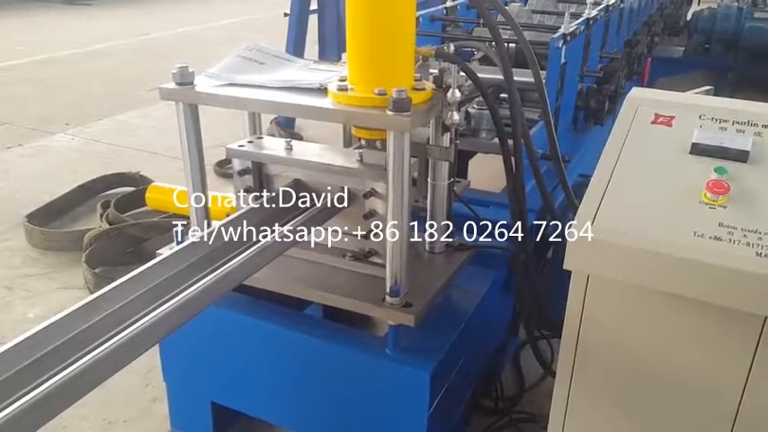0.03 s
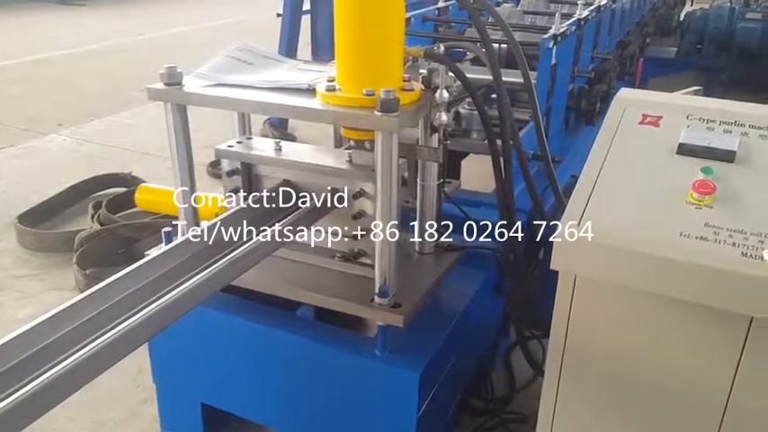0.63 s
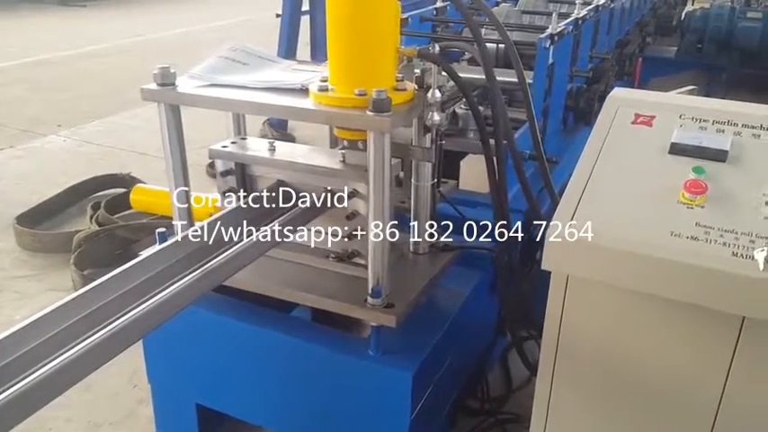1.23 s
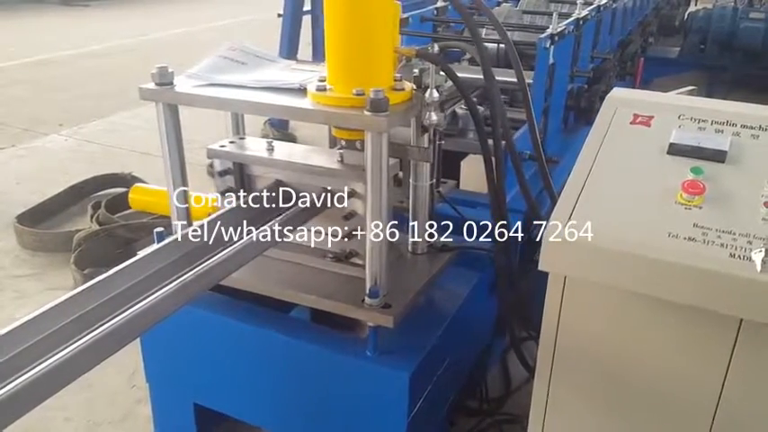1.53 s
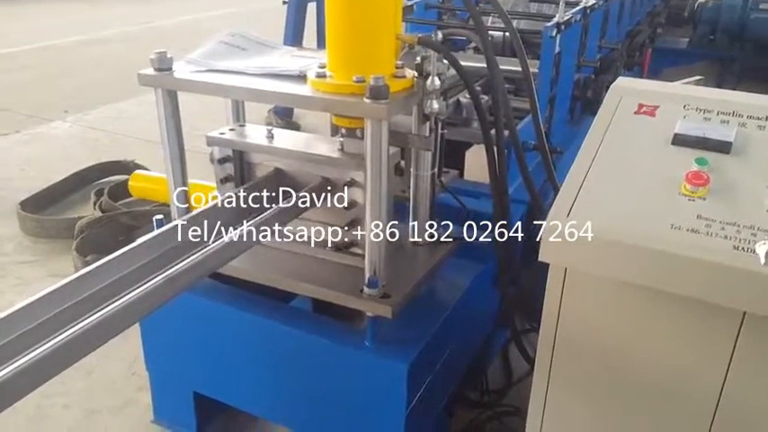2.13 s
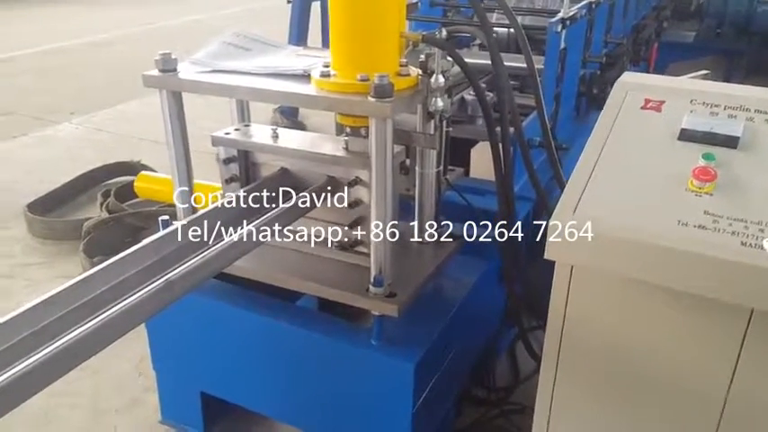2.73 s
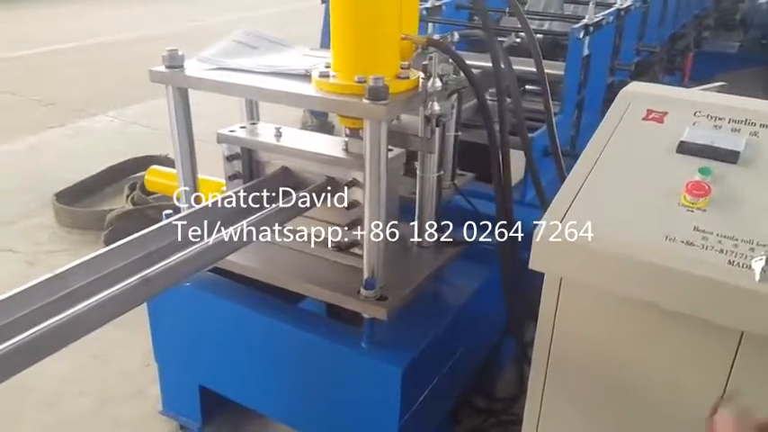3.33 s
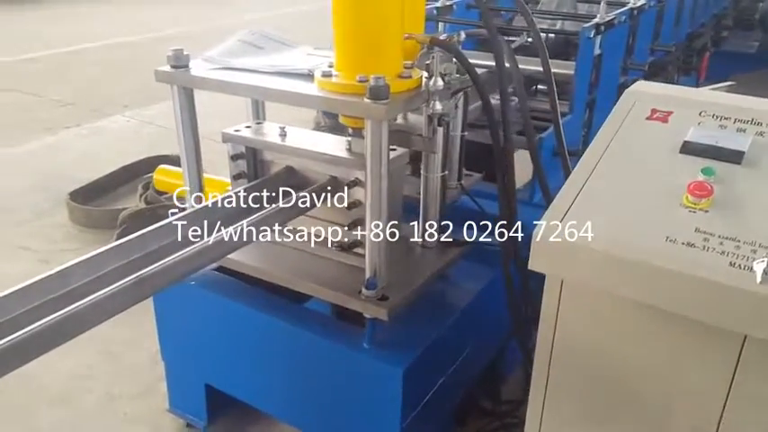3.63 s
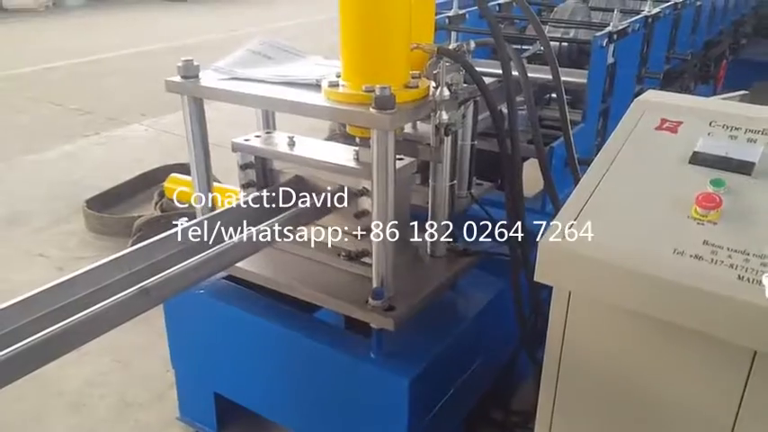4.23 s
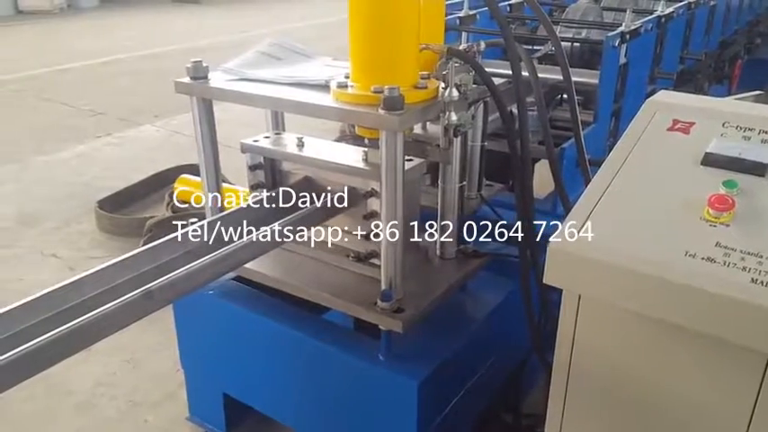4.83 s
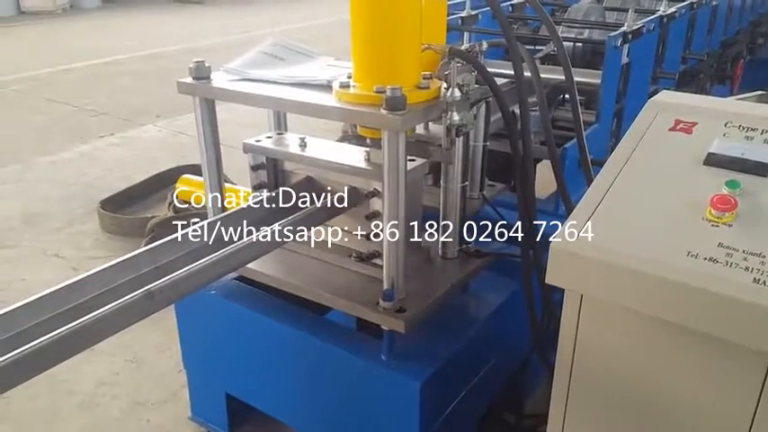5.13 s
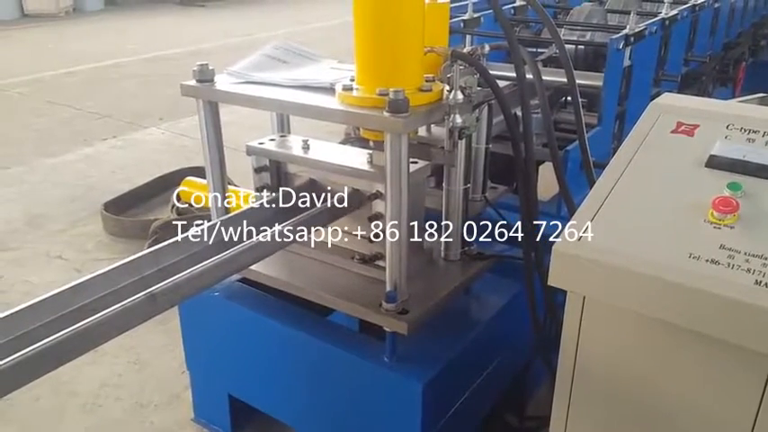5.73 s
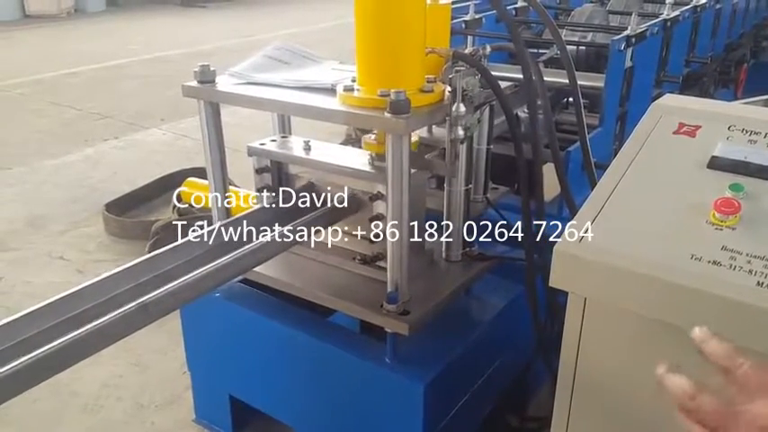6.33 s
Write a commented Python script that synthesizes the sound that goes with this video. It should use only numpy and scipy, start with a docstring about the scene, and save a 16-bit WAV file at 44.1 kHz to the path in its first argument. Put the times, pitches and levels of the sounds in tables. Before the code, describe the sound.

A hydraulic pump drones over the rumble and fine rattle of a metal forming machine, its tone shifting as the microphone moves nearby. Rollers groan, and sliding steel adds a hiss, brief scrapes and a faint squeal. Then the drive thuds and winds down, and a blade cuts the steel channel with one loud metallic bang, leaving a short jangle and a workshop echo.

```python
"""A workshop hall, with a stereo pair drifting past the hydraulic cutter of a roll forming machine.
The ten-vane pump hums on multiples of its shaft speed, its tones shifting as we cross standing waves.
The rolls rumble and groan under load; the steel strip hisses, scrapes and squeals through them.
Near six seconds the line stops with a thud, the hum sinks, and the blade shears the steel channel
with a bang that rings in the hall."""
import sys
import numpy as np
from scipy import signal
from scipy.fft import rfft, irfft
from scipy.io import wavfile

SR = 44100
rng = np.random.default_rng(int(sys.argv[2]) if len(sys.argv) > 2 else 0)


def store_wav(level_fs):
    """Save 16-bit WAV to argv[1]."""
    pcm = np.round(np.clip(np.atleast_2d(level_fs), -1, 1) * 32767)
    wavfile.write(sys.argv[1], SR, pcm.T.astype(np.int16))


N = 291060
T = np.arange(N) / SR
SHAFT_HZ, STOP_S, BRAKE_HZ_PER_S = 24.747, 5.87, 10.5  # the drive is switched off and the shaft slows
CUT_S, REST_DB_PER_S = 6.08, 25.5  # the cutter takes the oil and the line comes to rest
THROB_S, THROB_RISE_S = 3.38, 0.87  # we enter a spot where the pump's upper tones largely beat together

# The microphone's path. Each row: time in seconds, place (0, 1 and 2 are three spots in the hall).
PLACE = [(0, 0.34), (.9, 0), (2.8, 0.88), (3.4, 1.3), (4.0, 1.73), (4.7, 1.87), (6.6, 2.06)]
# Balance at the pair. Each row: frequency in Hz, left over right in dB.
BALANCE = [(100, -0.6), (500, 0), (1000, -0.5), (1700, 1), (2500, -7), (3300, -8), (4500, 0), (7000, 1),
           (10000, -7), (12000, -6.5), (14000, 3)]
# The rolls bear down about every two seconds. Each row: time in seconds, load in dB, groan pitch in Hz.
LOAD = [(0, 1, 584), (.11, -5, 544), (.24, -6, 553), (.44, -11.5, 547), (.75, -9, 555), (1.22, -9.5, 460),
        (1.4, -4.5, 517), (1.6, -4.5, 588), (1.84, 0, 608), (2.02, -3.5, 560), (2.3, -4, 533),
        (2.44, -10, 535), (3.35, -11.5, 522), (3.55, -6, 533), (3.8, -4, 557), (4.04, -2.5, 520),
        (4.55, -10.5, 532), (5.85, -20, 525)]
# Spectra of the rolls, the drive and the rubbed strip. Each row: frequency in Hz, relative level in dB.
ROLL_DRONE = [(100, -35), (200, -4.5), (270, 1), (340, -4.5), (410, -6), (520, -3), (610, -2), (720, -5),
              (950, -10.5), (1300, -15.5), (2500, -30), (6000, -63), (10000, -91)]
DRIVE_RUSH = [(80, -19), (280, -3.5), (420, -5.5), (580, -5.5), (800, 1), (1000, -2), (1250, -5),
              (1600, -10), (2100, -14.5), (3000, -28.5), (5000, -35), (8000, -63), (14000, -75)]
STRIP_HISS = [(100, -43), (500, -23), (1200, -13), (1800, -2.5), (2100, -2), (2450, -1.5), (3000, -4),
              (3500, -5), (4300, -13.5), (4900, -16.5), (5400, -19), (6300, -24.5), (7200, -36.5),
              (8600, -52), (14000, -62)]


def pump(turns, waver_db=1.3, drift_rad=0.15, flutter=0.018, breakup_db=5, throb_lag=0.83):
    """Vane pulses and their once-a-turn sidebands; each tone swells and fades as the microphone moves."""
    # Each entry, by multiple of shaft speed: level in dB at each of the three spots,
    # left over right in dB, left lead in radians.
    tones = {10: (-25.5, -23, -24.5, 1.5, 0), 11: (-44.5, -51, -40, -3.5, 2),
             18: (-46, -39, -46, 2.5, -3.5), 19: (-29, -24, -22, 0, 0.2), 20: (-34, -33.5, -32.5, 0, -.5),
             28: (-47, -40.5, -39.5, 0.5, 1), 29: (-30.5, -26, -29, 4.5, 0.5),
             30: (-28, -27, -34.5, 1.5, 0.1), 31: (-35.5, -29.5, -23, 2.5, 1),
             32: (-47, -32.5, -39.5, -1, 0), 34: (-48, -49, -45.5, 7, 1), 35: (-38.5, -58.5, -54, 3, 2.5),
             36: (-33, -37.5, -39.5, 2, -0.5), 37: (-32.5, -42, -34.5, 8, -0.7), 38: (-36, -34, -34, 3, 1),
             39: (-29, -23.5, -27, 4, -0.8), 40: (-33, -36, -31.5, 7.5, 2), 41: (-27.5, -33, -44.5, -4, 0),
             42: (-34.5, -38.5, -42.5, 3, -0.3), 43: (-48.5, -45.5, -47.5, 1.5, 0),
             49: (-49.5, -42.5, -43, -2.5, 4), 50: (-32, -35, -31, 6, -1.1),
             51: (-47.5, -47.5, -45, 6.5, -0.5), 57: (-58.5, -47.5, -43.5, 5, -2),
             59: (-37.5, -47.5, -51.5, -3, 1.2), 60: (-35, -37, -35, 2.5, -2),
             61: (-40.5, -39.5, -41, 9, -1.8), 62: (-50, -51, -51, 2.5, 3), 68: (-46, -49.5, -45, 4.5, 2),
             69: (-47, -42, -40, 9, -3.5), 70: (-55.5, -45.5, -45.5, 7.5, -1.5),
             71: (-45, -41, -42.5, -0.5, -2.5), 78: (-48.5, -46, -57, 10.5, 0.7),
             90: (-67, -53.5, -60, -9, 3), 97: (-52.5, -46.5, -60, -4.5, -2),
             100: (-57, -53.5, -52, -3.5, 2.5), 140: (-63.5, -61.5, -54.5, -4, 3.5),
             160: (-63, -57.5, -57.5, 0, -1)}
    place, out = curve(PLACE), np.zeros((2, N))
    vane_lag = rng.random(size=20)  # in turns; each vane harmonic shares its lag with its sidebands
    focus = 0.68 * ramp(THROB_S, THROB_RISE_S)
    slowing = 1 - shaft_speed() / SHAFT_HZ
    for order, (*place_db, side_db, lead) in tones.items():
        # a sinking tone beats with its echoes and breaks up; those near the casing's resonance hold on
        off_resonance = min(abs(order - 34) / 15, 1) ** 2
        smear = flutter + (10 + 26 * off_resonance) * slowing
        breakup = np.minimum(smear, 1)
        beats_db = breakup * (breakup_db * (np.tanh(wander(18)) - .5) - 5 * off_resonance)
        tone_db = np.interp(place, np.arange(len(place_db)), place_db)
        tone_db -= 0.16 * breakup * np.maximum(tone_db + 31, 0)  # loud tones lose their standing wave
        level = amp(tone_db + waver_db * wander(2.4) + beats_db)
        # echoes spread the sidebands into an even grind; in focus the upper ones throb once a turn
        harmonic = round(order / 10)
        sideband = order - 10 * harmonic
        spread = (.21 * sideband ** 2 + .5) % 1 - .5 + .12 * (rng.random() - .5)
        lag = vane_lag[harmonic] + throb_lag * order + spread * (1 - focus * (order >= 35))
        phase = 2 * np.pi * (order * turns - lag) + drift_rad * wander(1.0) + smear * wander(30)
        out += level * amp(split(side_db)) * np.cos(phase + split(lead))
    return np.sqrt(2) * amp(effort_db()) * out


def cutter(crack_db=-5, frame_db=-8, ring_db=-23, hall_db=-22, hall_rise_s=0.028, jangle=0.0081):
    """Each blow is a short crunch that shakes the frame, jangles the loose channel and fills the hall."""
    # Each row: start in seconds, level in dB, crunch decay in seconds, treble tilt in dB per octave,
    # ringing in dB. The blade's first touch pins the channel and damps it.
    blows = [(6.092, -10, 0.042, 3.5, -6), (6.106, -14.5, 0.011, 0, -2.5), (6.135, -12.5, 0.0053, 3.5, 2),
             (6.140, 4.5, .0085, -2, -2.5), (6.151, -1, 0.014, -0.5, -2.5), (6.192, -9, 0.0079, -8, 3.5),
             (6.216, -6, 0.037, -7.5, -0.5), (6.315, -5, .006, -14, -9), (6.359, -32, .01, -16, -2),
             (6.464, -17.5, .017, -12, 7.5), (6.495, -14, 0.024, -12.5, 3)]
    # The crunch. Each row: frequency in Hz, relative level in dB.
    crunch = [(40, -35), (120, -20), (280, -2), (560, 0.5), (1000, 2.9), (1500, 1), (2400, 4), (3100, -5.5),
              (4000, -11), (5200, -10), (7000, -26), (10000, -30), (14000, -19)]
    # The channel's ring. Each row: frequency in Hz, relative level in dB, seconds to fall 60 dB.
    channel_modes = [(539, -4.5, .8), (592, 4, 0.52), (683, -9, 0.4), (750, -5, 0.57), (826, -8, 0.9),
                     (860, 1, 0.8), (1230, -13, 0.88), (1344, 4, 0.36), (1459, 9.5, 0.47),
                     (1696, 4.5, 0.57), (1793, -1, 0.3), (1830, 2, 0.57), (1994, 1, 0.74),
                     (2180, -16, 0.37), (2326, 9, 0.28), (2430, 0.5, 0.43), (2460, 8, 0.35),
                     (2596, 5, 0.46), (2740, -8, 0.51), (3415, -6.5, 0.39), (4460, 1, .28), (5039, -9, .26),
                     (5600, -15, .28), (6330, -11.5, 0.4), (6900, -17, 0.43)]
    # Decay of the press frame and of the hall. Each row: frequency in Hz, seconds to fall 60 dB.
    frame_decay = [(100, 0.13), (1000, 0.14), (2400, 0.22), (5000, 0.15), (9000, 0.084), (14000, 0.068)]
    hall_decay = [(100, 2.2), (500, 3.9), (1000, 2.8), (2400, 1.53), (4000, 1.44), (7000, 0.26),
                  (10000, 0.45), (14000, 0.25)]
    t, hz, out = T[:SR], np.fft.rfftfreq(SR, 1 / SR), np.zeros((2, N))
    pad = 256  # samples of room for the tilt filter ahead of the attack
    for s, db, decay_s, tilt_db, ringing_db in blows:
        crack = amp(crack_db) * noise(crunch, size=SR) * np.exp(-t / decay_s)
        frame = amp(frame_db) * fade(noise(crunch, size=SR), frame_decay)
        hall = amp(hall_db) * fade(noise(crunch, size=SR), hall_decay) * (1 - np.exp(-t / hall_rise_s))
        # the channel chatters in the die, so its modes waver
        clock = t + jangle * np.cumsum(wander(58)[:SR]) / SR
        ring = np.zeros((2, SR))
        for mode_hz, mode_db, t60 in channel_modes:
            level = amp(ring_db + mode_db + split(at_hz(BALANCE, mode_hz))) * decay(t, t60)
            ring += level * np.sin(2 * np.pi * (mode_hz * clock + rng.random((2, 1))))
        blow = np.pad(crack + amp(ringing_db) * (frame + hall + ring), ((0, 0), (pad, 0)))
        # hard contacts are bright, the settling of the loose piece is dull
        colour = amp(tilt_db * np.log2(1 + hz / 2000))
        add(out, s - pad / SR, amp(db) * irfft(rfft(blow, SR) * colour, SR))
    return out


def rolls(turns, rumble_db=-31, shudder_db=4, drone_db=-18, rush_db=-26, throb_lag=0.83):
    """The frame rumbles and shudders, the rolls drone with load, the drive's rush throbs once a turn."""
    # The frame's rumble and the deep shake of its base. Each row: frequency in Hz, relative level in dB.
    frame_rumble = [(15, -23), (32, -15), (41, -13.5), (50, -7.5), (68, -7), (92, 0), (130, -3.5),
                    (190, -5), (280, -5), (600, -52), (3000, -100)]
    base_shake = [(20, -18), (36, -9), (50, 0.5), (65, -3), (90, -15.5), (200, -53.5), (1000, -100)]
    load_db = curve(LOAD)
    frame_jerks, base_jerks = shudders()
    rumble = noise(frame_rumble) * np.hypot(amp(rumble_db + 0.26 * load_db), amp(shudder_db) * frame_jerks)
    drone = noise(ROLL_DRONE) * amp(drone_db + 0.69 * load_db)
    throb = 0.18 * ramp(THROB_S, THROB_RISE_S) * np.cos(2 * np.pi * (turns - throb_lag))
    rush = noise(DRIVE_RUSH) * amp(rush_db) * (1 + throb)
    return rumble + noise(base_shake) * base_jerks + drone + rush


def groan(level_db=-24):
    """The loaded rolls ring in one moving resonance: a narrow core inside a rough skirt."""
    hz = curve(LOAD, column=2)
    core = resonate(noise(ROLL_DRONE), hz, width_hz=15)
    skirt = resonate(noise(ROLL_DRONE), hz, width_hz=70)
    return (core + skirt) * amp(level_db + curve(LOAD))


def strip(rub_db=-31, slide_db=-62, grain_db=0.5, ripple_db=2.2, mode_spacing_hz=24):
    """Steel rubs through the rolls, ringing in many close modes, and slides grainily through the die."""
    # Resonances of the strip. Each row: frequency in Hz, width in Hz, height above the hiss in dB.
    peaks = [(1750, 79, 5.5), (2244, 76, 6.5), (2750, 110, 3), (3280, 200, 2), (3630, 140, 2),
             (4510, 300, 5)]
    # The sheet sliding in the die. Each row: frequency in Hz, relative level in dB.
    die_hiss = [(2000, -28.5), (4900, -4), (5300, 29.5), (5800, 18.5), (6500, 15.5), (7000, 13.5),
                (7900, 7.5), (8600, -12.5), (9500, -0.5), (12000, -3), (14000, -4)]
    hz, modes_hz = np.fft.rfftfreq(N, 1 / SR), np.arange(0, SR / 2, mode_spacing_hz)
    modes_db = ripple_db * np.interp(hz, modes_hz, rng.standard_normal(len(modes_hz)))
    modes_db += sum(db / (1 + (2 * (hz - peak_hz) / width) ** 2) for peak_hz, width, db in peaks)
    rub = noise(STRIP_HISS, detail_db=modes_db) * amp(rub_db + rubbing_db())
    # the sheet scrapes in the die, then slides more freely, then comes to rest
    sliding_db = 14.5 * ramp(1.19, .3) - 5.5 * ramp(2.44, 0.93) - REST_DB_PER_S * since(CUT_S) / 2
    slide = noise(die_hiss, detail_db=modes_db) * amp(slide_db + sliding_db)
    return (rub + slide) * amp(grain_db * wander(120))


def stick_slip():
    """The strip sticks and slips on a roll in clear groans, and its edge scrapes along the guides."""
    # Each row: start in seconds, length in seconds, first and last pitch in Hz, level in dB.
    groans = [(.04, 0.12, 581, 557, -21.5), (.06, 0.14, 475, 460, -23), (.15, .42, 546.5, 550, -27),
              (1.22, .11, 440, 453, -24.5), (1.33, 0.12, 496, 516, -24), (1.52, .22, 595, 620, -32),
              (1.74, 0.15, 625, 616, -25), (2.1, 0.39, 560, 538.5, -26.5)]
    scrapes = [(.68, 0.074, 2500, 2530, -40), (.77, 0.28, 2530, 2485, -47), (1.23, .23, 2405, 2460, -46.5),
               (1.67, 0.17, 1860, 1800, -37), (1.89, 0.15, 2720, 2680, -44), (2.02, .08, 2610, 2650, -36)]
    return (slip_notes(groans, blur_rad=0.29, waver_hz=35, flicker_db=1)
            + slip_notes(scrapes, blur_rad=1.3, waver_hz=60, flicker_db=3))


def slip_notes(notes, blur_rad, waver_hz, flicker_db):
    """Each friction note swells, glides and wavers as the grip changes."""
    out = np.zeros((2, N))
    for s, length, first_hz, last_hz, db in notes:
        part = slice(round(s * SR), round((s + length) * SR))
        hz = first_hz + (last_hz - first_hz) * ramp(s, length)[part]
        phase = 2 * np.pi * np.cumsum(hz) / SR + blur_rad * wander(waver_hz)[part]
        level = amp(db + flicker_db * wander(waver_hz)[part]) * swell(s, length)[part]
        add(out, s, np.sqrt(2) * level * np.cos(phase) * amp(split(at_hz(BALANCE, first_hz))))
    return out


def thud(rise_s=0.016):
    """The frame booms softly as the drive stops, and again as the cutter recoils."""
    # The frame's modes. Each row: frequency in Hz, relative level in dB, seconds to fall 60 dB.
    frame_modes = [(108, -27, 0.2), (174, -22, 0.29), (308.5, -12.5, 0.26), (272.5, -23, 0.63),
                   (354, -25, 0.42)]
    # Each row: start in seconds, level in dB.
    jolts = [(5.899, 2), (6.03, -7), (6.234, -10.5), (6.42, -11)]
    t, out = T[:SR // 2], np.zeros((2, N))
    boom = sum(amp(db) * decay(t, t60) * np.sin(2 * np.pi * hz * t) for hz, db, t60 in frame_modes)
    for s, db in jolts:
        add(out, s, amp(db) * boom * (1 - np.exp(-(t / rise_s) ** 2)))
    return out


def run_down(width_hz=32):
    """Tones of the slowing pump flare, rough with echoes, as they sink through the casing's resonances."""
    # Each row: multiple of shaft speed, start in seconds, length in seconds, level in dB.
    whines = [(40.8, 5.85, 0.23, -24.5), (38.4, 6.3, .25, -31), (20.9, 5.99, 0.11, -25),
              (40.6, 6.15, 0.16, -32)]
    speed, rush = shaft_speed(), noise(DRIVE_RUSH)
    return sum(resonate(rush, order * speed, width_hz) * amp(db) * swell(s, length)
               for order, s, length, db in whines)


def rattle(turns, level_db=-40):
    """The drive's fine rattle repeats every turn: a buzz that grows with friction and varies by place."""
    # Each row: frequency in Hz, relative level in dB.
    spectrum = [(400, -20.5), (800, -12), (1200, -6), (1500, -4), (1800, 2.5), (2050, -2), (2450, -1),
                (2780, -1), (3200, -16.5), (4000, -5.5), (6000, -27.5), (9000, -59.5)]
    size, place, out = round(SR / SHAFT_HZ), curve(PLACE), np.zeros((2, N))
    position = turns % 1 * size
    for spot in range(3):
        nearness = np.sqrt(np.clip(1 - abs(place - spot), 0, 1))
        one_turn = noise(spectrum, size=size)
        out += nearness * [np.interp(position, np.arange(size), side, period=size) for side in one_turn]
    return out * amp(level_db + effort_db() + 0.23 * rubbing_db())


def squeal(gain_db=-1):
    """Friction keeps one mode of the channel singing thinly; it sinks as the channel grows longer."""
    # Each row: time in seconds, pitch in Hz, level in dB.
    mode = [(1.5, 3170, -67), (2.3, 3086, -41), (3.05, 2860, -39.5), (3.7, 2754, -50.5), (4.4, 2812, -37.5),
            (4.75, 2796, -42), (5.15, 2765, -35), (5.8, 2740, -55)]
    return resonate(noise(STRIP_HISS), curve(mode), width_hz=18) * amp(gain_db + curve(mode, column=2))


def air(level_db=-63):
    """A faint hiss of air behind the machine."""
    # Each row: frequency in Hz, relative level in dB.
    spectrum = [(3000, -8.5), (6000, 4), (7500, 0.5), (8700, -10), (10500, -8), (12200, -1.5), (14000, -1)]
    return amp(level_db) * noise(spectrum)


def shaft_speed():
    """Turns per second: steady, then braked."""
    return SHAFT_HZ - BRAKE_HZ_PER_S * since(STOP_S)


def effort_db(unload_db_per_s=113):
    """The pump works evenly, then drops away at the cut."""
    return -unload_db_per_s * since(CUT_S)


def shudders(rise_s=0.092, decay_s=0.22):
    """How hard the frame and its heavy base shake as the strip jerks in the rolls."""
    # Each row: start in seconds, level of the frame in dB, level of the base in dB.
    jerks = [(.67, -27, -47), (.85, -31, -47), (1.02, -28.5, -42), (1.73, -32.5, -33.5), (1.92, -33.5, -36),
             (2.12, -40.5, -47.5), (2.53, -43, -52), (3.3, -44.5, -40.5), (3.72, -36, -40),
             (3.92, -35.5, -49), (4.36, -40, -46.5)]
    power = np.zeros((2, N))
    for s, *levels_db in jerks:
        envelope = ramp(s, rise_s) * np.exp(-since(s + rise_s) / decay_s)
        power += np.outer(amp(levels_db), envelope) ** 2
    return np.sqrt(power)


def rubbing_db(bite_s=1.42, rise_s=0.24, bite_db=7):
    """Friction of the strip: light until it bites, a little more at each jerk."""
    grip = amp(bite_db * (ramp(bite_s, rise_s) - 1))
    frame_jerks, _ = shudders()
    return 20 * np.log10(np.hypot(grip, 0.21 * frame_jerks / frame_jerks.max()))


def noise(spectrum, size=N, detail_db=0):
    """Coloured noise of unit RMS at the pair: alike in the bass, unrelated in the treble."""
    # Each row: frequency in Hz, likeness of left and right from 0 to 1.
    coherence = [(60, .993), (140, .985), (280, .95), (500, .8), (1000, .4), (2000, .15), (4000, 0),
                 (14000, 0)]
    hz = np.fft.rfftfreq(size, 1 / SR)
    left, unrelated = rfft(rng.standard_normal((2, size)))
    likeness = at_hz(coherence, hz)
    right = likeness * left + np.sqrt(1 - likeness ** 2) * unrelated
    pair = np.array([left, right]) * amp(split(at_hz(BALANCE, hz)))
    return unit(irfft(pair * amp(at_hz(spectrum, hz) + detail_db), size))


def wander(rate_hz, size=4096):
    """A smooth random drift of unit RMS."""
    hz = np.fft.rfftfreq(size, T[-1] / size)
    slow = irfft(rfft(rng.standard_normal(size)) * np.exp(-(hz / rate_hz) ** 2) * (hz > 0), size)
    return np.interp(T, np.linspace(0, T[-1], size), unit(slow))


def resonate(x, hz, width_hz):
    """A steep resonance that follows a pitch curve, at unit RMS."""
    carrier = np.exp(2j * np.pi * np.cumsum(hz) / SR)
    pole = np.exp(-2 * np.pi * width_hz / SR)
    envelope = signal.lfilter([(1 - pole) ** 2], [1, -2 * pole, pole ** 2], x / carrier)
    return unit((carrier * envelope).real)


def fade(x, t60s):
    """Lets each band die at its own speed."""
    hz, t, bands = signal.stft(x, SR, nperseg=256)
    return signal.istft(bands * decay(t, at_hz(t60s, hz)[:, None]), SR, nperseg=256)[1][:, :x.shape[1]]


def decay(t, t60):
    return np.exp(-np.log(1000) * t / t60)


def amp(db):
    return 10 ** (np.asarray(db) / 20)


def unit(x):
    return x / np.sqrt(np.mean(x ** 2) + 1e-20)


def split(difference):
    """Half up on the left, half down on the right."""
    return difference * np.array([[.5], [-.5]])


def curve(rows, column=1):
    """One column of a table, joined by straight lines in time."""
    columns = np.transpose(rows)
    return np.interp(T, columns[0], columns[column])


def at_hz(rows, hz):
    """A table's value, joined by straight lines in log frequency."""
    row_hz, values = np.transpose(rows)
    return np.interp(np.log(hz + 1), np.log(row_hz + 1), values)


def since(s):
    """Seconds since a moment; zero before it."""
    return np.maximum(T - s, 0)


def ramp(s, length):
    """A straight rise from 0 to 1."""
    return np.minimum(since(s) / length, 1)


def swell(s, length):
    """A rounded rise and fall."""
    return np.sqrt(np.abs(np.sin(np.pi * ramp(s, length))))


def add(mix, s, sound):
    """Mixes a sound in at s seconds."""
    part = mix[:, round(s * SR):][:, :sound.shape[-1]]
    part += sound[..., :part.shape[-1]]


def scene():
    """The pump and drive turn with the shaft; the rolls and strip run until the cut."""
    turns = np.cumsum(shaft_speed()) / SR
    line = rolls(turns) + groan() + strip() + squeal() + air()
    line *= amp(-REST_DB_PER_S * since(CUT_S))
    return line + stick_slip() + pump(turns) + run_down() + rattle(turns) + thud() + cutter()


def record(dry, ceiling=0.77, cutoff_hz=14300):
    """The recorder rounds off the loudest peaks and cuts the highest treble."""
    rounded = dry / (1 + (dry / ceiling) ** 6) ** (1 / 6)
    lowpass = signal.firwin(511, cutoff_hz, window=("kaiser", 9), fs=SR)
    return signal.oaconvolve(rounded, lowpass[None], "same")


dry = scene()
out = record(dry)
store_wav(out)
```